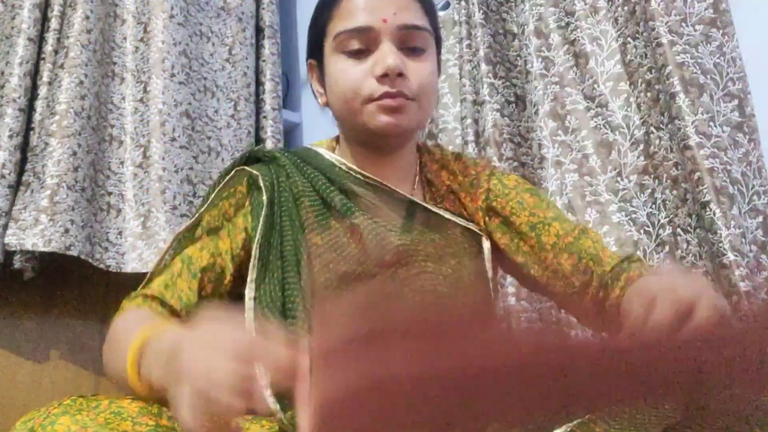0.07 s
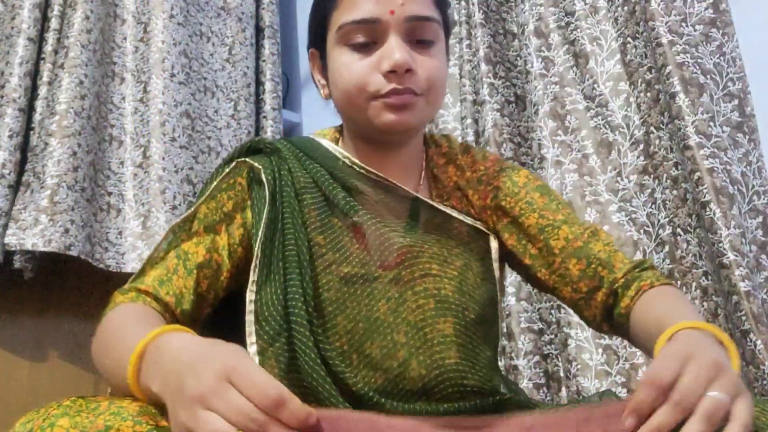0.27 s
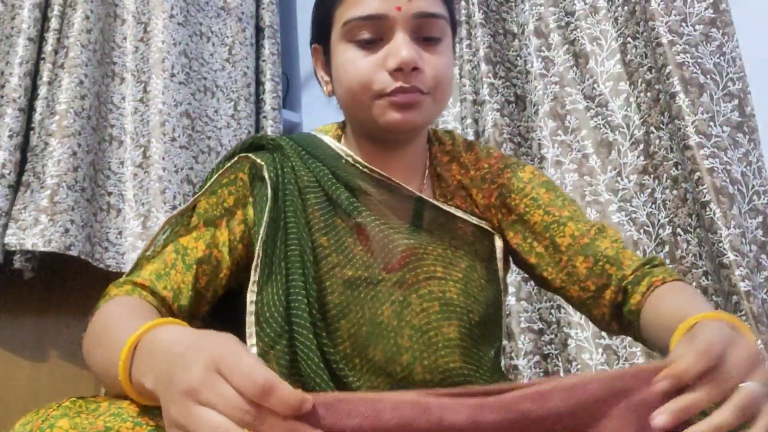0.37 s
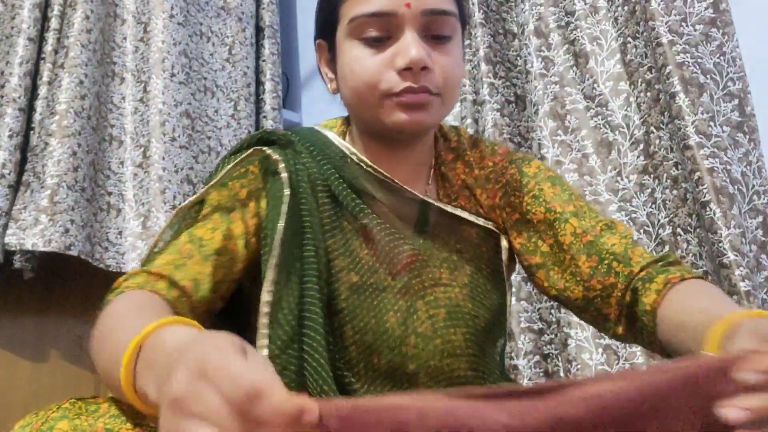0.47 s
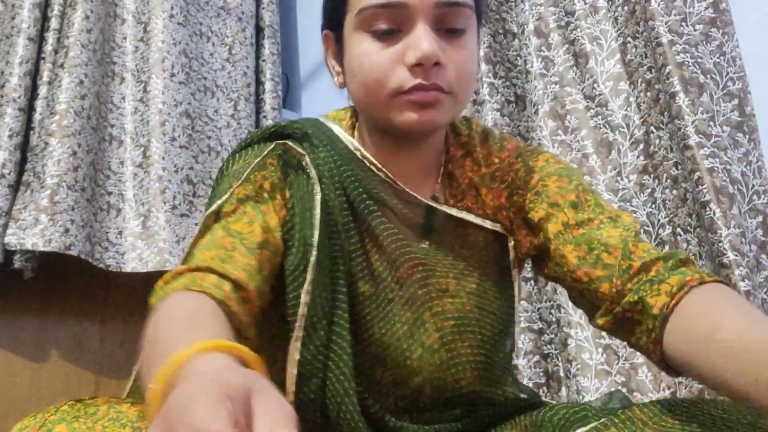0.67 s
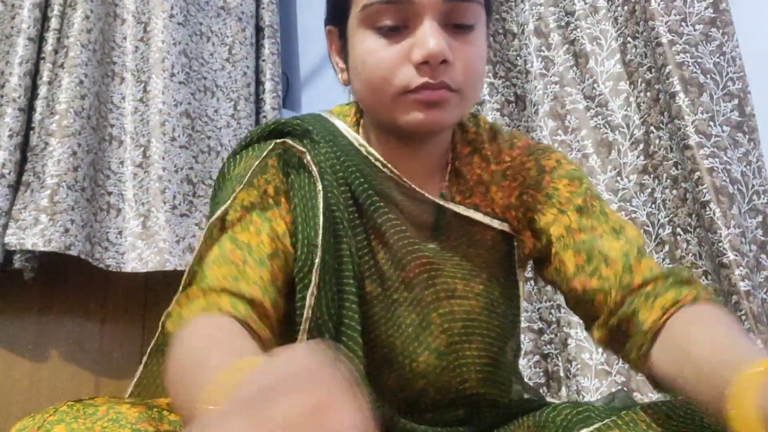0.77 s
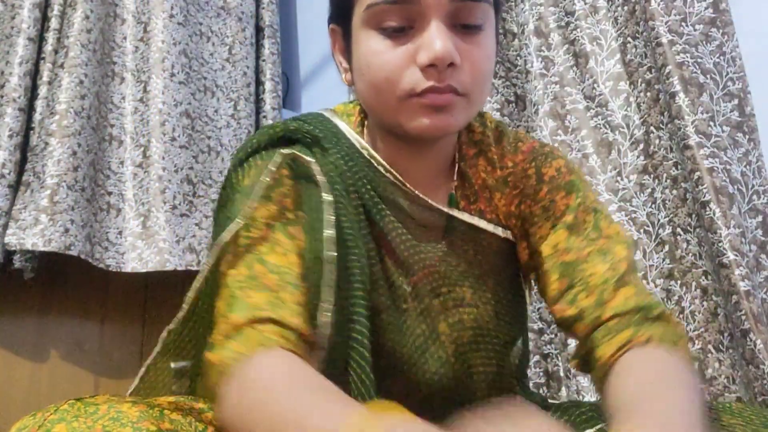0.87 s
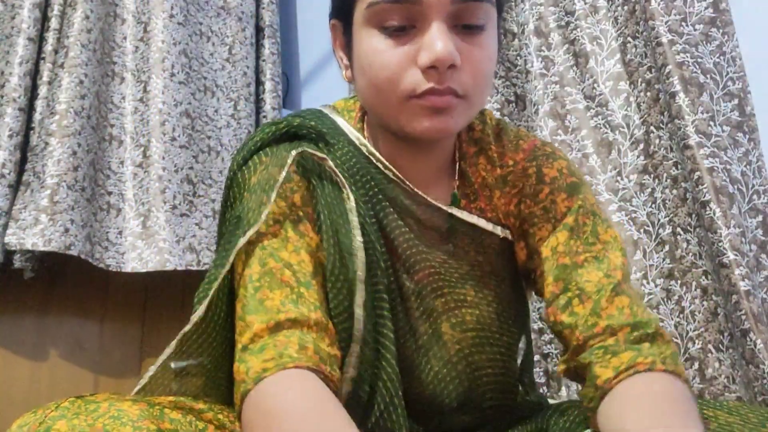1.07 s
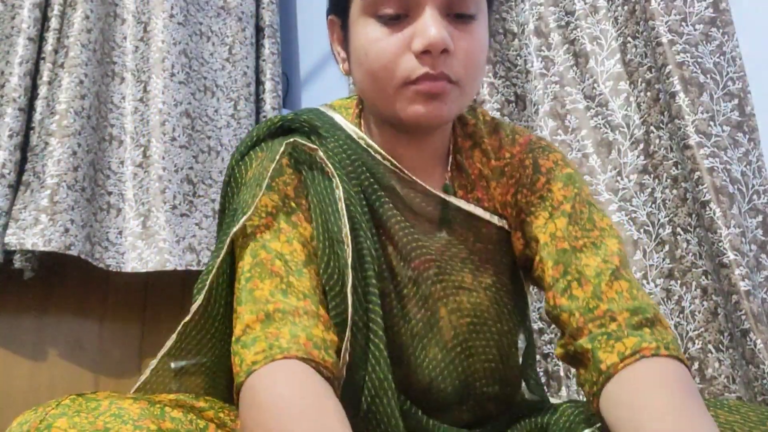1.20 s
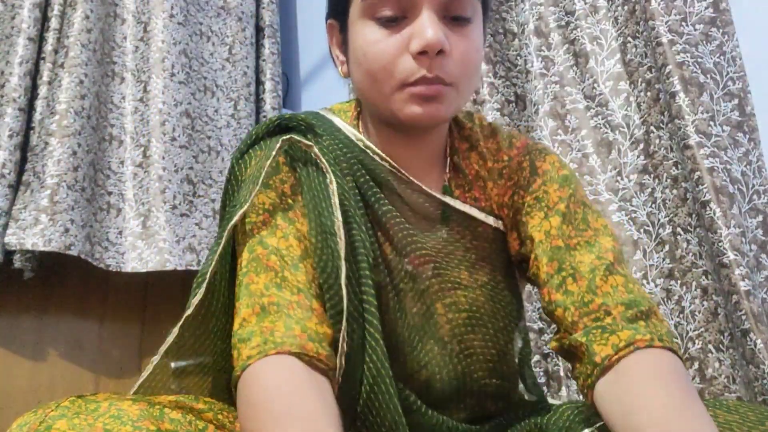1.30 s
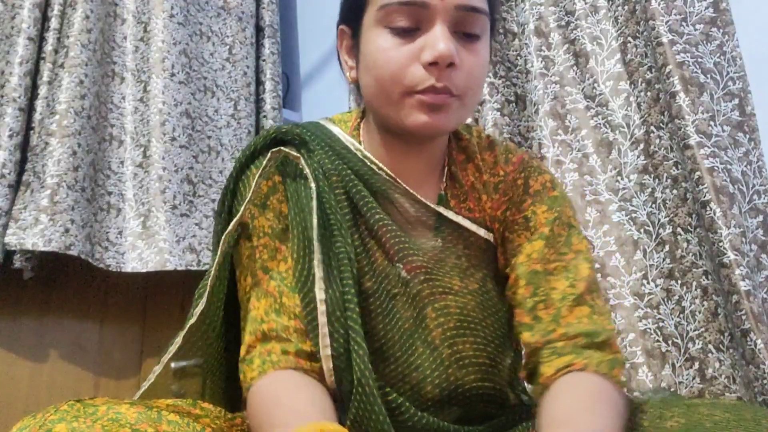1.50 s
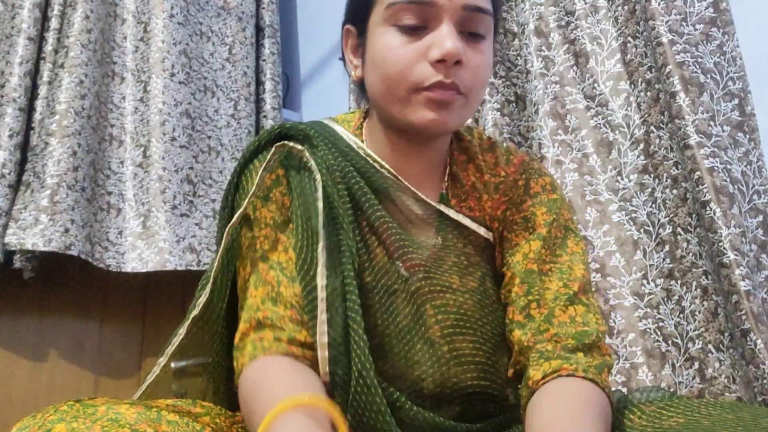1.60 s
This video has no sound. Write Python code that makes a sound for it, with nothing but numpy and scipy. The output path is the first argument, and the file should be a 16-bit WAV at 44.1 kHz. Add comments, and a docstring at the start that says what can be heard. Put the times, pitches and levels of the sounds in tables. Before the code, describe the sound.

A cloth flaps once with a windy thump, then is patted and smoothed by hand.

```python
"""A cloth flapped down and smoothed

A cloth snaps softly in front of a phone in a quiet room, and its draught carries turbulent eddies
over the two microphone ports. The cloth settles, hands pat it and a palm smooths it flat, its
threads catching and slipping. A faint low drone swells and fades behind the room noise."""
import sys
import numpy as np
from scipy import signal
from scipy.fft import rfft, irfft
from scipy.io import wavfile
from scipy.ndimage import uniform_filter1d, map_coordinates

SR = 44100
rng = np.random.default_rng(int(sys.argv[2]) if len(sys.argv) > 2 else 0)


def pcm_store(signal):
    """Save signal as 16-bit PCM."""
    levels = np.round(np.clip(np.atleast_2d(signal), -1, 1) * 32767)
    wavfile.write(sys.argv[1], SR, levels.astype(np.int16).T)


N = 72765
T = np.arange(N) / SR

# Pressure of the draught at each port. Each row: time in seconds, level in dB.
DRAUGHT_LEFT = [(.17, -56.5), (.21, -39.5), (.26, -36.5), (.30, -28.5), (.318, -24.5), (.335, -12.5),
                (.35, -25), (.38, -29.5), (.40, -40.5), (.45, -41), (.53, -58)]
DRAUGHT_RIGHT = [(.17, -57.5), (.22, -39.5), (.268, -42), (.282, -32.5), (.291, -16.5), (.298, -12),
                 (.308, -21), (.345, -22.5), (.366, -23.5), (.378, -18), (.392, -31), (.412, -25.5),
                 (.44, -41), (.49, -38.5), (.515, -48.5)]
# Source spectra. Each row: frequency in Hz, relative spectral density in dB.
EDDY_SPECTRUM = [(20, -2), (50, 2.5), (110, 6), (200, -2), (330, -6), (500, -18.5), (800, -32), (1500, -50),
                 (2500, -70.5), (6000, -105)]  # at full air speed
SNAP_SPECTRUM = [(40, -5), (170, 3.5), (280, 1.5), (500, -9.5), (900, -18.5), (1600, -27.5), (3600, -41.5),
                 (4300, -42), (5200, -40.5), (6000, -52), (15000, -69.5)]
PAT_SPECTRUM = [(40, 9), (100, 5), (250, 2), (430, -8.5), (700, -12), (1200, -21), (2200, -27), (5000, -21)]
WAFT_SPECTRUM = [(12, -4), (24, 15.5), (45, -6.5), (80, -20), (200, -52), (1000, -90)]
PALM_SPECTRUM = [(200, 8.5), (600, 5.5), (1200, 4.5), (2400, 0), (4100, -3), (4750, 2.5), (5400, -2),
                 (6200, -9), (7500, -9), (11000, -14), (15500, -14)]
BRUSH_SPECTRUM = [(150, -2), (700, 2.5), (1900, 1.5), (3100, -8.5), (4200, -10.5), (5100, -14), (6200, -38),
                  (15000, -30)]
SETTLE_SPECTRUM = [(200, 9.5), (600, 10.5), (1200, -1), (2200, -4.5), (3400, -8), (4200, -9), (5000, -12),
                   (6200, -17), (9000, -14), (15500, -18.5)]
GLIDE_SPECTRUM = [(3000, -17), (5000, 1), (6200, -1), (8500, -2), (12000, -4), (15500, 0)]
ROOM_SPECTRUM = [(20, -1), (60, 0), (130, 0), (300, -6.5), (450, -12), (700, -19), (1100, -20.5),
                 (2000, -30), (3300, -29), (4200, -38), (5000, -34), (6200, -44), (10000, -39.5),
                 (15500, -39.5)]
# Pats of the hands. Each row: start, attack and decay in seconds, level in dB, upper band edge in Hz.
PATS = [(0.807, 0.00098, 0.0071, -45, 600), (1.001, 0.016, 0.016, -44, 2470)]
# Gentle movements. Each row: start, attack and decay in seconds, level in dB.
WAFTS = [(0.999, 0.075, 0.064, -42), (1.231, .05, 0.12, -68), (1.58, .04, 0.066, -63)]  # air pushed by the hands
BRUSHES = [(.872, 0.031, 0.03, -64.5), (1.488, 0.029, 0.093, -69.5)]  # cloth on cloth
SETTLES = [(.24, 0.15, 0.25, -63)]  # cloth coming to rest
GLIDES = [(.42, 0.098, 0.052, -81), (.73, .022, .015, -73.5)]  # cloth on the surface
# Sound of the sliding palm. Each row: time in seconds, level in dB.
PALM_LEVEL = [(.98, -85.5), (1.04, -68.5), (1.09, -63.5), (1.125, -58.5), (1.17, -61.5), (1.21, -64),
              (1.265, -66), (1.305, -64), (1.36, -73.5), (1.46, -74), (1.53, -84), (1.6, -75), (1.65, -84)]
# Folds catching. Each row: start in seconds, centre and bandwidth in Hz, decay in seconds, level in dB.
TICKS = [(0.2317, 3350, 1005, 0.0022, -59), (0.512, 4180, 1100, 0.00077, -56),
         (0.8767, 1620, 920, 0.0052, -58.5), (0.8966, 3030, 600, 0.006, -63)]
# Distant drone. Each row: time in seconds, frequency in Hz, level in dB.
DRONE = [(0, 166.5, -66), (.2, 165, -85), (.55, 164.4, -62), (.68, 165.3, -61), (0.819, 161, -56),
         (1.0, 161.5, -56), (1.118, 159, -64.5), (1.22, 155.1, -61.5), (1.359, 156, -79), (1.65, 160, -83)]
# Room noise. Each row: time in seconds, level in dB.
ROOM_LEVEL = [(0, -62), (.2, -61), (.5, -59.5), (1.3, -59.5), (1.65, -58.5)]
# Difference signal of the ports, weak in the bass. Each row: frequency in Hz, side gain in dB.
PORT_SIDE = [(60, -5.5), (110, -13.5), (200, -16), (380, -9.5), (700, -2), (1300, -1.5), (2400, 1.5),
             (15000, 0)]
# Tonal balance of the ports. Each row: frequency in Hz, left minus right in dB.
PORT_BALANCE = [(200, 1.5), (700, -.5), (2400, -1.5), (4400, -3.5), (8000, 4), (15000, -1.5)]


def draught(levels, eddy_rate, full_speed_db=-14, split_hz=202):
    """Convected turbulence: faster air sweeps eddies over a port sooner, so it is louder and brighter."""
    pressure = curve(levels)
    speed = eddy_rate * (pressure / undb(full_speed_db)) ** .3
    eddies = colour(rng.standard_normal(N), EDDY_SPECTRUM)
    big = shape(eddies, [(split_hz / 2, 0), (split_hz, -6), (split_hz * 2, -40)])
    small = eddies - big
    field = even(big, span_s=.035) * np.std(big) + even(small, span_s=.014) * np.std(small)
    return pressure * map_coordinates(field, [np.cumsum(speed)], mode="mirror")


def snap():
    """Sudden tension: folds pull taut in a flurry of impulses that merge into one soft snap."""
    folds = even(colour(slips(per_s=2500), SNAP_SPECTRUM), span_s=.013)
    envelope = swell(start=.2123, attack=.0082, decay=.0085, db=-38.5, hold=.017)
    return stereo(folds, pan_db=1, side_db=-4.5) * envelope


def pats(push_s=.0029, push_db=3.5):
    """Soft impact: each pat gives one pressure pulse with a dull scuffle around it."""
    out = 0
    for start, attack, decay, db, top_hz in PATS:
        scuffle = even(band(colour(noise_pair(), PAT_SPECTRUM), 20, top_hz), span_s=.018)
        push = np.sin(np.pi * np.clip((T - start - attack) / push_s + .5, 0, 1)) ** 2
        out += stereo(scuffle, side_db=-5.5) * swell(start, attack, decay, db)
        out += undb(db + push_db) * push
    return out


def wafts():
    """Displacement: moving hands push air in slow, very low pressure swells."""
    air = even(colour(noise_pair(), WAFT_SPECTRUM), span_s=.16)
    return stereo(air, side_db=-5) * swells(WAFTS)


def rubbing():
    """Stick-slip friction: threads catch and let go so often that their impulses merge into a hiss."""
    def threads(spectrum):
        return colour(slips(per_s=9000), spectrum)

    palm = stereo(threads(PALM_SPECTRUM), pan_db=2.5) * curve(PALM_LEVEL)
    brush = stereo(threads(BRUSH_SPECTRUM), pan_db=-1.5) * swells(BRUSHES)
    settle = stereo(threads(SETTLE_SPECTRUM), pan_db=-1.2) * swells(SETTLES)
    glide = stereo(threads(GLIDE_SPECTRUM)) * swells(GLIDES)
    return palm + brush + settle + glide


def ticks(attack_s=.00057):
    """Transient release: a fold that catches and lets go radiates a brief band of noise."""
    out = 0
    for start, hz, width, decay, db in TICKS:
        burst = even(band(noise_pair(), hz - width / 2, hz + width / 2), span_s=2 / width)
        out += stereo(burst, side_db=-2.5) * swell(start, attack_s, decay, db)
    return out


def reverberation(direct, t60_s=.75, delay_s=.005):
    """Diffuse reflection: the room returns sound in a dense tail that decays exponentially."""
    tail = noise_pair() * np.exp(-np.log(1000) * T / t60_s) * (T > delay_s)
    tail /= np.sqrt(np.sum(tail ** 2) / 2)
    return signal.fftconvolve(direct, tail, axes=1)[:, :N]


def drone(pitch_wander=.015, waver_db=4, pan_db=1.1):
    """Random modulation: a far-off tone wavers in frequency and amplitude."""
    def drift():
        return colour(rng.standard_normal(N), [(2, 0), (12, 0), (40, -30), (200, -120)])

    times, hz, db = np.array(DRONE).T
    pitch = np.interp(T, times, hz) * (1 + pitch_wander * drift())
    level = undb(np.interp(T, times, db) + waver_db * drift())
    tone = np.sqrt(2) * np.sin(2 * np.pi * np.cumsum(pitch) / SR)
    return tone * level * undb([[pan_db / 2], [-pan_db / 2]])


def room_noise():
    """Ambient noise: a soft broadband floor, strongest in the bass."""
    return curve(ROOM_LEVEL) * stereo(colour(noise_pair(), ROOM_SPECTRUM))


def stereo(pair, pan_db=0, side_db=0):
    """Mid-side mixing: the left port takes the sum of two streams, the right their difference."""
    mid, side = pair[0], shape(pair[1], PORT_SIDE) * undb(side_db)
    half_balance = np.array(PORT_BALANCE) * [1, .5]
    left = shape(mid + side, half_balance) * undb(pan_db / 2)
    right = shape(mid - side, half_balance * [1, -1]) * undb(-pan_db / 2)
    return np.array([left, right])


def slips(per_s, scatter_db=2):
    """Shot noise: two independent streams of impulses of random sign and size."""
    hits = rng.random((2, N)) < per_s / SR
    return hits * np.sign(noise_pair()) * undb(scatter_db * noise_pair())


def noise_pair():
    """Two independent streams of white noise."""
    return rng.standard_normal((2, N))


def undb(db):
    """Decibels to amplitude ratio."""
    return 10 ** (np.asarray(db) / 20)


def curve(rows):
    """Envelope through (seconds, dB) rows, silent outside them."""
    times, db = np.array(rows).T
    return undb(np.interp(T, times, db, left=-np.inf, right=-np.inf))


def swell(start, attack, decay, db, hold=0):
    """Envelope with linear attack, hold and exponential decay."""
    age = T - start
    return undb(db) * np.clip(age / attack, 0, 1) * np.exp(-np.maximum(age - attack - hold, 0) / decay)


def swells(rows):
    """Superposition of one swell per row."""
    return sum(swell(*row) for row in rows)


def even(x, span_s):
    """Steady x by dividing it by its running rms."""
    power = uniform_filter1d(np.abs(signal.hilbert(x)) ** 2 / 2, max(int(span_s * SR), 2))
    return x / np.sqrt(power + 1e-12)


def shape(x, points):
    """Filter x by a gain curve of (Hz, dB) points."""
    hz, db = np.array(points, float).T
    bins_hz = np.maximum(np.fft.rfftfreq(N, 1 / SR), 1)
    return irfft(rfft(x) * undb(np.interp(np.log(bins_hz), np.log(hz), db)), N)


def colour(x, points):
    """Filter x by (Hz, dB) points, rolled off below the first, and scale it to unit rms."""
    hz, db = points[0]
    shaped = shape(x, [(hz / 4, db - 20), *points])
    return shaped / np.sqrt(np.mean(shaped ** 2))


def band(x, low_hz, high_hz):
    """Band-pass filter."""
    return signal.sosfilt(signal.butter(3, [low_hz, high_hz], "band", fs=SR, output="sos"), x)


def scene(echo_db=-11):
    """Superposition: cloth and hands excite the room, while the draught acts on the ports alone."""
    direct = snap() + wafts() + pats() + rubbing() + ticks()
    echo = undb(echo_db) * reverberation(direct)
    wind = np.array([draught(DRAUGHT_LEFT, eddy_rate=1), draught(DRAUGHT_RIGHT, eddy_rate=1.02)])
    return direct + echo + wind + drone() + room_noise()


def record(dry, cutoff_hz=15750):
    """Band limiting: the phone cuts the highest treble with a steep low-pass filter."""
    return signal.sosfilt(signal.ellip(10, .2, 70, cutoff_hz, fs=SR, output="sos"), dry)


dry = scene()
out = record(dry)
pcm_store(out)
```